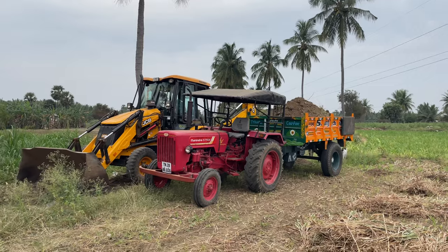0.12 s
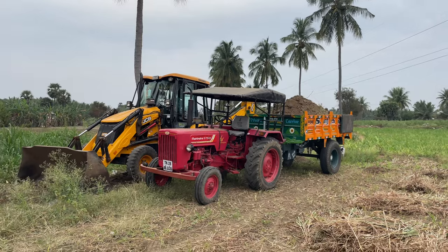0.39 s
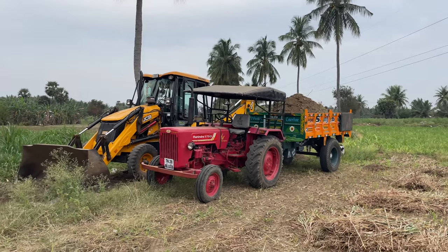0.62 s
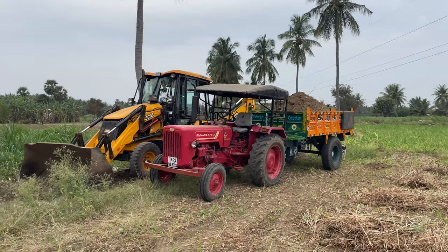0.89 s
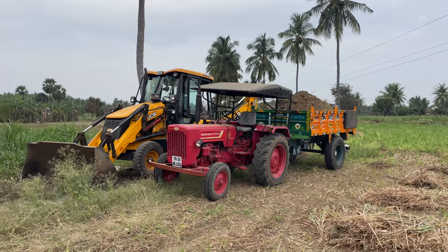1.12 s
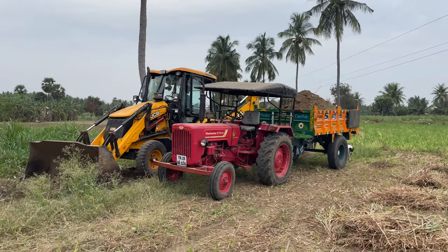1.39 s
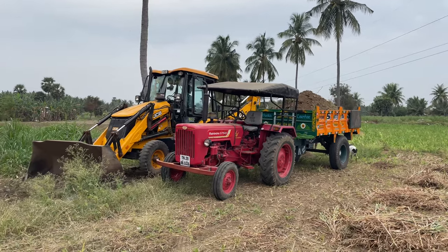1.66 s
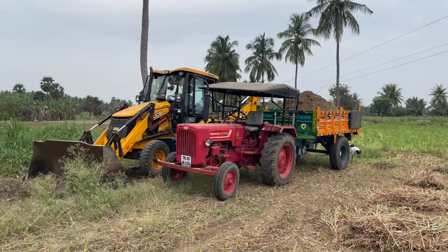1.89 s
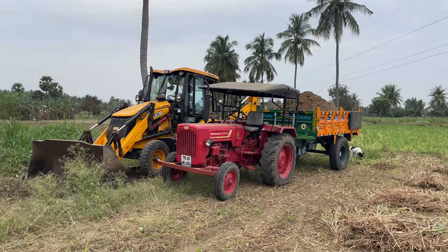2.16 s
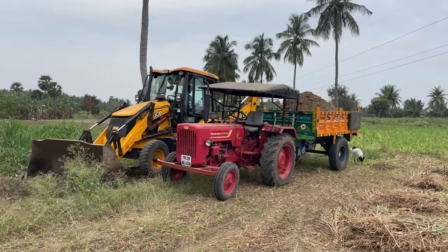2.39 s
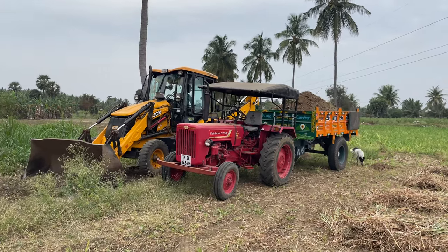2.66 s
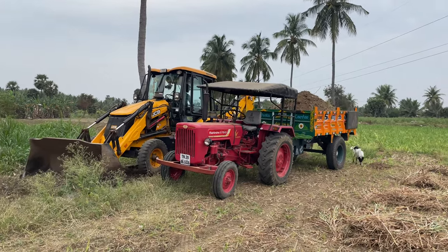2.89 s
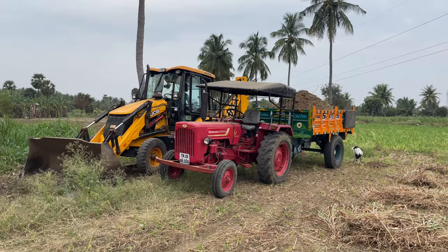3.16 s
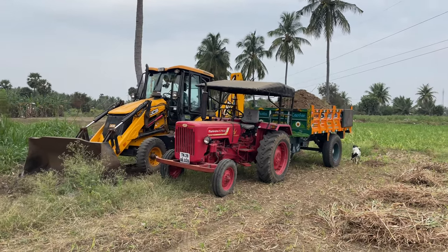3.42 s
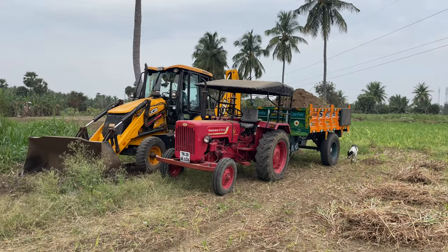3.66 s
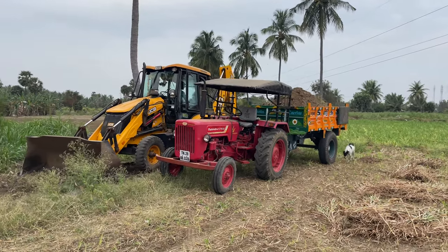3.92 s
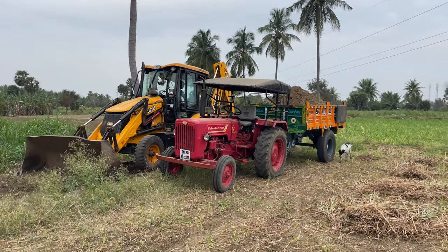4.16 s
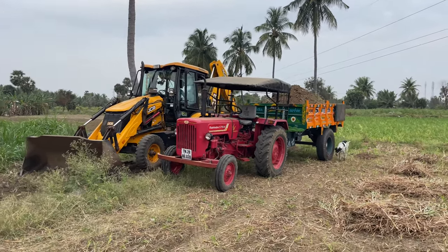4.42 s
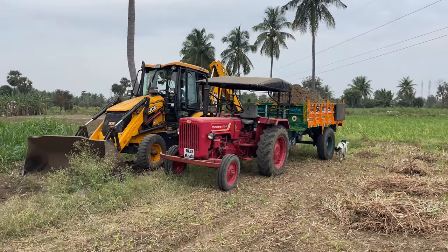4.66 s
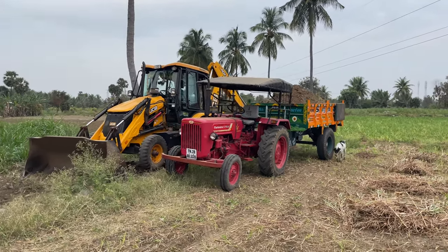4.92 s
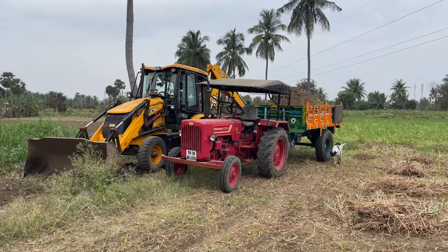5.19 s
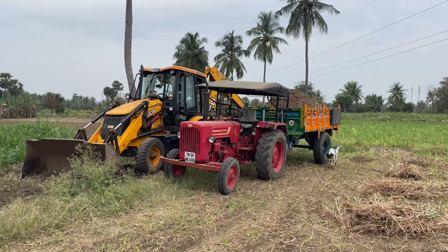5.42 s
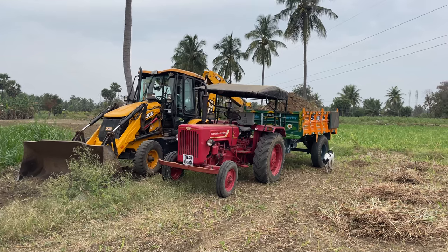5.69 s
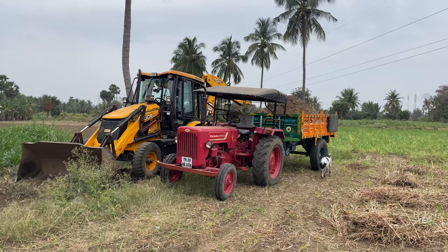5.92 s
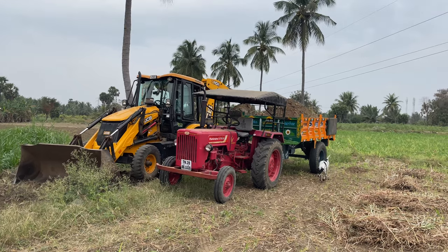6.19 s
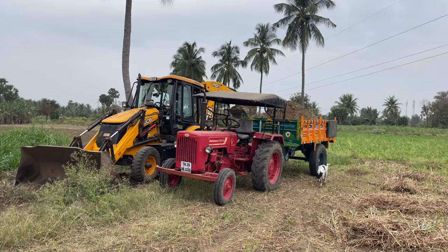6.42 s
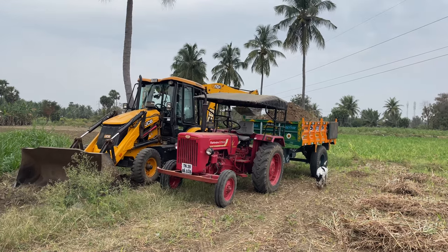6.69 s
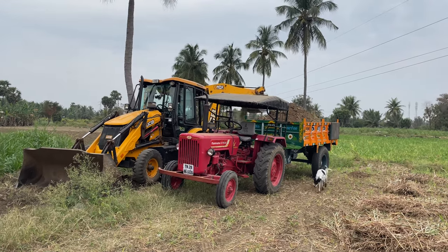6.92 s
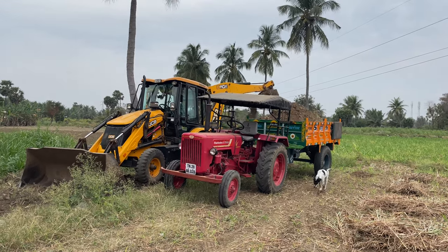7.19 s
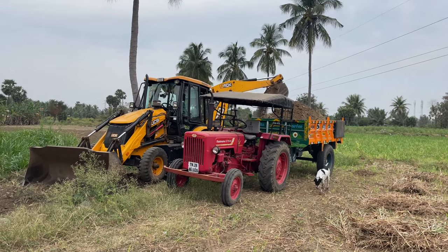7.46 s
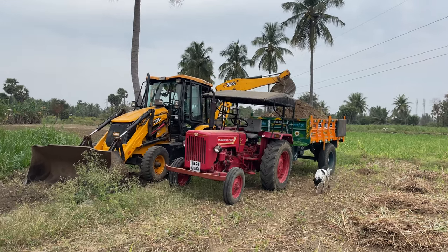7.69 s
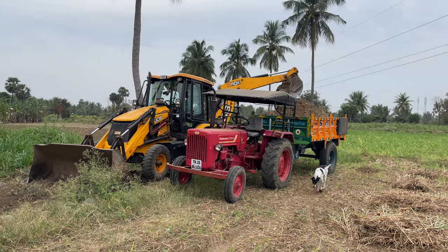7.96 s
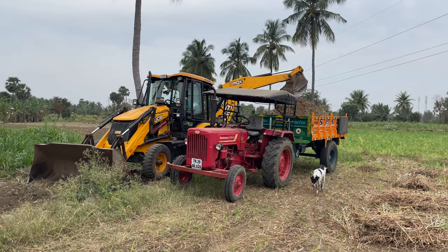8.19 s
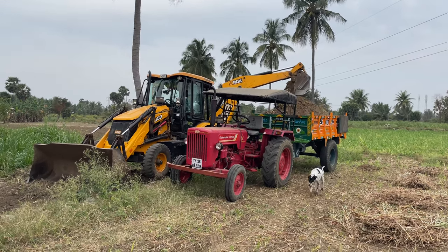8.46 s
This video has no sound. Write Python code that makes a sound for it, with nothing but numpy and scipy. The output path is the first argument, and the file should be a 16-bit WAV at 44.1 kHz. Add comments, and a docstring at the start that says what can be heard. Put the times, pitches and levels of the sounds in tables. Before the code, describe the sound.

Steady low diesel drone with fan roar and wavering hydraulic whine outdoors, soft soil hisses, then one hard rattling metal bucket knock.

```python
"""In an open field a four-cylinder diesel works at a nearly steady speed, with fans and intakes roaring.
Crank-locked tones make the exhaust hum and gear whir; shaken resonances make the combustion clatter.
Shaped noise makes roar, valve hiss and dry soil; tones and narrow noise make hydraulic song and block ringing.
Lever moves make the speed shift and hunt, a far bird chirps, and near the end the bucket knocks.
A two-port microphone hears it all."""
import sys
import numpy as np
from scipy import signal
from scipy.fft import rfft, irfft
from scipy.io import wavfile
from scipy.ndimage import uniform_filter1d

SR = 44100
rng = np.random.default_rng(int(sys.argv[2]) if len(sys.argv) > 2 else 0)


def unload_wav(signal):
    """Save mono or channel-first audio to the path in sys.argv[1] as 16-bit WAV at rate SR, clipped to [-1, 1]."""
    wavfile.write(
        sys.argv[1],
        SR,
        np.round(np.clip(np.atleast_2d(signal).T, -1, 1) * 32767).astype(np.int16),
    )


def boost_factor(decibels):
    """Convert a level in decibels to a linear amplitude factor."""
    exponent = np.asarray(decibels, float) / 20
    return 10 ** exponent


N = 378378  # length in samples
T = np.arange(N) / SR  # time in seconds
CRANK_STEPS = 3800  # crank angles told apart in one engine cycle


def evened(x):
    """Scales a sound to rms 1."""
    return x / np.sqrt(np.mean(x ** 2) + 1e-20)


def read(points, hz, column=1):
    """Reads a column of a frequency table on a log axis."""
    rows = np.transpose(points)
    return np.interp(np.log(hz + 1), np.log(rows[0] + 1), rows[column])


def coloured(x, colour):
    """Filters a sound by a table of frequency and level, then scales it to rms 1."""
    gain = boost_factor(read(colour, np.fft.rfftfreq(N, 1 / SR)))
    return evened(irfft(rfft(x) * gain, N))


def noise(colour):
    """Noise of rms 1 with the given spectrum."""
    return coloured(rng.standard_normal(N), colour)


def smooth_noise(count, size):
    """Chance of rms 1, smoothed over a number of samples."""
    return evened(uniform_filter1d(rng.standard_normal(count), size=size))


def wander(hz):
    """Slow chance of rms 1, mostly below hz."""
    smooth = uniform_filter1d(rng.standard_normal(N), size=800)
    return evened(signal.lfilter([1], [1, -np.exp(-2 * np.pi * hz / SR)], smooth))


def resonate(x, hz, width):
    """One resonance: a wider one dies away sooner."""
    r = np.exp(-np.pi * width / SR)
    return signal.lfilter([1, 0, -1], [1, -2 * r * np.cos(2 * np.pi * hz / SR), r * r], x)


def tone(hz):
    """A sine of rms 1 that follows a changing frequency."""
    return np.sqrt(2) * np.cos(2 * np.pi * np.cumsum(hz) / SR)


def arch(s, length):
    """The samples of an event and its progress from 0 to 1."""
    span = slice(max(round(s * SR), 0), round((s + length) * SR))
    return span, np.clip((T[span] - s) / length, 0, 1)


# Chirps of a far bird. Each row: start in seconds, rms level in dB at the top of the chirp before roughening.
BIRD_CHIRPS = [(6.66, -59), (6.81, -59), (6.97, -50.5), (7.14, -61), (7.3, -59)]


def bird():
    """Whistles whose pitch and level rise and fall together, slightly rough with distance."""
    length_s, end_hz, top_hz = .1, 4900, 5065
    out = np.zeros(N)
    for s, db in BIRD_CHIRPS:
        span, part = arch(s, length_s)
        rise = abs(np.sin(np.pi * part))
        out[span] += boost_factor(db) * rise ** 0.26 * tone(end_hz + (top_hz - end_hz) * rise)
    return out * (1 + 0.41 * smooth_noise(N, 150))


# Slides of dry soil. Each row: loudest moment in seconds, width (one sigma) in seconds,
# rms level in dB at the loudest.
SOIL_SLIDES = [(.28, 0.088, -42), (.84, 0.062, -36), (2.6, 0.12, -48), (2.89, 0.054, -52),
               (3.13, 0.067, -44), (3.76, 0.11, -44), (4.59, 0.039, -50), (5.24, 0.089, -44),
               (7.45, .05, -51)]
# Colour of the soil hiss. Each row: frequency in Hz, relative level in dB per Hz.
SOIL_SPECTRUM = [(1500, -14), (3500, 3), (6500, 6), (11000, 0.5), (16000, 3.5)]


def soil():
    """Sliding grains make a bright, uneven hiss that swells and fades."""
    swell = np.zeros(N)
    for s, width, db in SOIL_SLIDES:
        swell += boost_factor(db) * np.exp(-.5 * ((T - s) / width) ** 2)
    grains = boost_factor(0.81 * smooth_noise(N, 90))
    return swell * evened(noise(SOIL_SPECTRUM) * grains)


# The operator's levers load or free the pump. Each row: time in seconds, change of the settled
# crank speed in rpm.
LEVER_MOVES = [(-0.003, -45.3), (0.556, 25.2), (0.72, 11.9), (1.236, 16.9), (1.645, -10.3), (2.107, 11.1),
               (2.399, -12.3), (2.612, -44.7), (2.765, 39.9), (2.93, -4.0), (3.551, -6.8), (4.033, 12.3),
               (4.283, -24.2), (4.449, 24.5), (4.845, -7.7), (5.281, -6.5), (6.02, 1.4), (6.777, -4.3),
               (7.838, -5.7), (8.047, -38.0), (8.185, 22.0)]


def crank_speed():
    """Each lever move shifts the speed; the governor swings past the new value and settles."""
    start_rpm, hunt_hz, decay_s = 1407.6, 2.403, .45
    times, swing = T[::100], 2 * np.pi * hunt_hz
    rpm = np.full(len(times), start_rpm)
    for s, change in LEVER_MOVES:
        t = np.maximum(times - s, 0)
        hunting = np.cos(swing * t) + np.sin(swing * t) / swing / decay_s
        rpm += change * (1 - np.exp(-t / decay_s) * hunting)
    return np.interp(T, times, rpm)


def fuelling(rpm):
    """Load in dB: the governor answers a drop in speed a little late, and partly remembers it."""
    usual_rpm, lag_s, memory_s = 1389, 0.11, 1
    quick_db_per_rpm, slow_db_per_rpm = 0.09, 0.0555
    drop = np.interp(T - lag_s, T, usual_rpm - rpm)
    keep = np.exp(-1 / (memory_s * SR))
    remembered = signal.lfilter([1 - keep], [1, -keep], drop)
    return quick_db_per_rpm * drop + slow_db_per_rpm * remembered


def crank_pattern(turns):
    """One random value for each crank angle, repeated in every cycle."""
    return rng.standard_normal(CRANK_STEPS)[(turns % 1 * CRANK_STEPS).astype(int)]


# How hard each cylinder knocks. Each entry: relative level in dB, scaled where it is used.
CYLINDER_LEVELS = [0, 2, .5, -2]


def bursts(turns, lag, length, between, cylinders, uneven_db):
    """An envelope that rises at each firing and dies away; lag and length count in firings."""
    firings = 4 * turns - lag + 4  # the added 4 keeps the count positive
    count = firings.astype(int)
    size_db = cylinders * np.take(CYLINDER_LEVELS, count % 4) + uneven_db * rng.standard_normal(1000)[count]
    return uniform_filter1d(between + boost_factor(size_db) * np.exp(-(firings % 1) / length), size=60)


def ticks(turns, lag):
    """One sharp click at each ignition, unequal by cylinder and by chance."""
    count = (4 * turns - lag + 4).astype(int)
    size_db = 1.2 * np.take(CYLINDER_LEVELS, count % 4) + 1.5 * rng.standard_normal(1000)[count]
    return boost_factor(size_db) * (np.diff(count, prepend=count[0]) > 0)


# Colour of the fan and intake roar. Each row: frequency in Hz, relative level in dB per Hz.
ROAR_SPECTRUM = [(25, -21), (45, 1.5), (98, 6.5), (128, 13), (200, 3), (300, 3), (470, -13), (600, -4.5),
                 (1150, -8), (2000, -7.5), (3000, -7), (4600, -13), (5200, -68), (9000, -29), (15500, -33)]


def roar(turns, load_db):
    """Broad noise of fans and intakes, pulsing a little with the firings."""
    pulsing = bursts(turns, 0.62, 0.86, between=6.3, cylinders=.3, uneven_db=1.5)
    level_db = -32.5 + 0.083 * load_db + .5 * wander(21.0)
    return boost_factor(level_db) * evened(noise(ROAR_SPECTRUM) * pulsing)


# Colour of the noise from gears and belts. Each row: frequency in Hz, relative level in dB per Hz.
GEAR_SPECTRUM = [(250, -42), (380, 6), (560, -7.5), (720, -37), (1000, -6), (1600, -2), (2200, -38),
                 (3500, -24)]
# Tones of the timing gears and belts. Each row: multiple of the cycle rate,
# rms level in dB before wander and load.
GEAR_WHIR = [(34, -55), (45, -52), (47, -52), (48, -51), (49, -51), (51, -50), (52, -52), (53, -52),
             (55, -54), (57, -54), (59, -50), (61, -50), (62, -49), (63, -50), (87, -56), (89, -54),
             (90, -57), (101, -60), (112, -57), (113, -57)]


def gears(turns, load_db):
    """Gears and belts turn with the crank: noise that repeats every cycle, and a few clear tones."""
    repeating = boost_factor(-45) * coloured(crank_pattern(turns), GEAR_SPECTRUM)
    tones = np.zeros(N)
    for order, db in GEAR_WHIR:
        tones += boost_factor(db + wander(1.5)) * np.cos(2 * np.pi * (order * turns + rng.random()))
    return boost_factor(0.15 * load_db) * (repeating + np.sqrt(2) * tones)


# Tones of the hydraulic pump. Each row: multiple of the cycle rate, rms level in dB before wander and swell.
PUMP_TONES = [(60, -47), (66, -39), (72, -45), (80, -49), (186, -60)]
# Rise and fall of all the pump tones. Each row: time in seconds, gain in dB.
PUMP_GAIN = [(0, -6), (3.2, -1.5), (3.8, -3), (8, 0), (8.58, 0.5)]


def pump(turns):
    """Wavering tones whose pitch is tied to the crank that drives the pump."""
    tones = np.zeros(N)
    for order, db in PUMP_TONES:
        tones += boost_factor(db + 1.2 * wander(1.2)) * np.cos(2 * np.pi * (order * turns + rng.random()))
    times, gain_db = np.transpose(PUMP_GAIN)
    return np.sqrt(2) * boost_factor(np.interp(T, times, gain_db)) * tones


# Pump pressure building until the valve lets go. Each row: start in seconds, length in seconds,
# rms level in dB at the loudest.
PRESSURE_MOANS = [(-.05, 0.44, -34), (0.37, 0.36, -36.5), (2.2, 0.36, -45.5), (2.967, 0.4, -42),
                  (4.098, 0.57, -31.5), (4.373, 0.23, -31.5), (4.617, 0.43, -30.5), (5.1, 0.486, -36.5),
                  (5.354, 0.91, -40.5), (8.02, 0.24, -39.5), (8.234, 0.22, -36)]


def moans(turns):
    """A pressure tone at 24 times the cycle rate, swelling and fading with a late top."""
    out = np.zeros(N)
    for s, length, db in PRESSURE_MOANS:
        span, part = arch(s, length)
        pressure = abs(np.sin(np.pi * part ** 1.4)) ** 0.91  # a power over 1 puts the top late
        out[span] += boost_factor(db) * np.sqrt(2) * pressure * np.cos(2 * np.pi * 24 * turns[span])
    return out


# Passing gliding tones: first a swell of the pump's tone near 695 Hz, then valve whistles near 2.4 kHz.
# Each row: start in seconds, length in seconds, start pitch in Hz, end pitch in Hz,
# rms level in dB at the loudest.
GLIDING_TONES = [(3.3, 1.5, 692, 699, -42), (.7, .4, 2415, 2410, -49), (1.78, .15, 2415, 2430, -46),
                 (2.1, .45, 2415, 2410, -49), (2.75, .3, 2400, 2480, -45), (3.25, .25, 2410, 2460, -47),
                 (3.75, .63, 2405, 2435, -43.5), (4.5, .25, 2430, 2490, -41), (4.8, .3, 2430, 2440, -47),
                 (5.33, .2, 2500, 2420, -44), (5.6, .4, 2420, 2410, -45), (6.25, .65, 2410, 2425, -45),
                 (7.35, .6, 2430, 2440, -51)]


def passing_tones():
    """A pump swell and valve whistles: gliding tones with a slightly unsteady pitch."""
    out = np.zeros(N)
    for s, length, start_hz, end_hz, db in GLIDING_TONES:
        span, part = arch(s, length)
        glide = start_hz + (end_hz - start_hz) * part
        unsteady = 1 + .003 * smooth_noise(len(part), 2000)
        out[span] += boost_factor(db) * abs(np.sin(np.pi * part)) ** .3 * tone(glide * unsteady)
    return out


# Fuzzy whines pulsing with the firings: oil flow, and block ringing near 2.56 kHz. Each row: start in
# seconds, length in seconds, pitch in Hz, width in Hz, rms level in dB before the rise and fall.
FUZZY_WHINES = [(-.3, 1.3, 335, 40, -39), (.1, .75, 940, 90, -35), (.1, 1.0, 750, 50, -34),
                (5.6, .9, 335, 35, -41), (7.8, 1.3, 925, 40, -37), (1.0, 2.7, 1655, 40, -42),
                (4.5, 4.8, 2570, 60, -48), (-.1, 1.0, 2480, 160, -45), (2.55, .7, 2520, 140, -45),
                (8.1, .7, 2550, 90, -42)]


def whines(turns):
    """Noise pulsing with the firings, made into a fuzzy whine by a narrow resonance."""
    pulsing = bursts(turns, 0.374, 0.33, between=1.0, cylinders=1.01, uneven_db=-1.5)
    out = np.zeros(N)
    for s, length, hz, width, db in FUZZY_WHINES:
        span, part = arch(s, length)
        drive = pulsing[span] * rng.standard_normal(len(part))
        out[span] += boost_factor(db) * abs(np.sin(np.pi * part)) ** 0.74 * evened(resonate(drive, hz, width))
    return out


# Short groans as the arm moves. Each row: start in seconds, length in seconds, start pitch in Hz,
# end pitch in Hz, rms level in dB at the loudest before roughening.
ARM_GROANS = [(0.2, 0.16, 915, 955, -38), (0.275, 0.12, 742, 743, -35), (0.454, 0.12, 755, 745, -31.5),
              (0.64, .1, 960, 925, -34), (1.19, 0.052, 348, 357, -34), (1.463, 0.11, 955, 874, -34),
              (1.779, 0.136, 616, 500, -39.5), (2.03, 0.085, 630, 550, -40), (2.369, 0.093, 890, 905, -35),
              (2.57, .09, 270, 255, -35), (2.57, .1, 190, 160, -33), (2.68, .06, 230, 150, -31),
              (2.893, 0.05, 923, 936, -40)]


def groans():
    """The hydraulics groan: short gliding tones with a rough level."""
    out = np.zeros(N)
    for s, length, start_hz, end_hz, db in ARM_GROANS:
        span, part = arch(s, length)
        glide = start_hz + (end_hz - start_hz) * part
        rough = 1 + .2 * smooth_noise(len(part), 300)
        out[span] += boost_factor(db) * rough * abs(np.sin(np.pi * part)) ** 0.3 * tone(glide)
    return out


# The blow and its rebounds. Each row: time in seconds, peak level in dB, brightness in dB per octave.
BUCKET_KNOCKS = [(8.271, -15, -12), (8.288, -24, 6), (8.291, -13.5, 3), (8.2965, -10, 0),
                 (8.304, -13.5, -1.5), (8.312, -15, -4), (8.328, -17, -3), (8.341, -18.5, -5.5),
                 (8.36, -18, -11), (8.379, -22, -6), (8.400, -23, -6), (8.412, -20, -12),
                 (8.448, -16.5, -12.5), (8.488, -24, -2)]
# Ringing of the bucket steel. Each row: frequency in Hz, level in dB before the brightness tilt,
# time to fall by 60 dB in seconds.
BUCKET_STEEL = [(550, -4, .08), (830, -3, .06), (1150, -2, .03), (1500, 2, .04), (1900, -3, .02),
                (2570, 3, .045), (3150, 1, .025), (4040, -4, .015), (5200, -13, .012), (6200, -14, .01)]


def bucket():
    """A blow and its rebounds: sharp cracks with a short rattle shake the damped steel."""
    t, out = np.arange(SR // 4) / SR, np.zeros(N)
    for s, db, tilt_db in BUCKET_KNOCKS:
        crack = rng.standard_normal(len(t)) * (np.exp(-t / .002) + .3 * np.exp(-t / .028))
        ring = np.zeros(len(t))
        for hz, mode_db, t60 in BUCKET_STEEL:
            mode_gain = boost_factor(mode_db + tilt_db * np.log2(hz / 2000))
            ring += mode_gain * evened(resonate(crack, hz, 2.2 / t60))
        crash = evened(resonate(resonate(crack, 2200, 3000), 2200, 3000))  # broad, without a clear pitch
        hit = evened(ring) + .7 * boost_factor(tilt_db) * crash
        hit = signal.lfilter(*signal.butter(2, 4200, fs=SR), hit)  # the trailer screens the treble
        part = out[round(s * SR):][:len(t)]
        part += boost_factor(db) * hit[:len(part)] / abs(hit).max()
    return out


# Colour of the exhaust valve hiss. Each row: frequency in Hz, relative level in dB per Hz.
VALVE_SPECTRUM = [(4000, 5), (5500, -7), (8000, -19), (11000, 1.5), (16000, -7)]


def valves(turns):
    """A puff of hiss as each exhaust valve opens."""
    puffs = bursts(turns, 0.17, 0.2, between=0.07, cylinders=.2, uneven_db=4.0)
    return boost_factor(-52.0) * evened(noise(VALVE_SPECTRUM) * puffs)


# Engine block and panels rung by combustion. Each row: frequency in Hz, width in Hz, rms level in dB
# before wander and load, crank lag in firings, relative size of the ignition tick.
BLOCK_MODES = [(330.3, 68, -41, 0.569, 4.2), (719, 92, -36, 0.54, 14.6), (878, 160, -39.5, 0.45, 1.1),
               (1320, 54, -47.5, 0.4, 8.4), (1462, 69, -44.5, 0.38, 14.6), (1668, 92, -46.5, 0.45, 8.1),
               (2466, 90, -43.5, 0.318, 12), (2572, 79, -47, 0.5, 12), (2740, 1450, -45.5, 0.433, 2.7),
               (3420, 98, -54, 0.14, 5), (4075, 190, -49.5, 0.24, 5), (6970, 1860, -48.5, 0.089, 1.5)]


def clatter(turns, load_db):
    """Each combustion ticks and shakes the block, partly alike in every cycle; its modes ring on."""
    out = np.zeros(N)
    for hz, width, db, lag, tick in BLOCK_MODES:
        shake = .4 * crank_pattern(turns) + rng.standard_normal(N)
        combustion = bursts(turns, lag, .18, between=.36, cylinders=1.01, uneven_db=1.1)
        drive = combustion * shake + tick * ticks(turns, lag)
        ringing = evened(resonate(resonate(drive, hz, width), hz, 3 * width))
        out += boost_factor(db + 0.8 * wander(2.9)) * ringing
    return boost_factor(0.55 * load_db) * out


# Exhaust tones, every fourth multiple a firing tone. Each row: multiple of the cycle rate,
# relative level in dB before load.
EXHAUST_TONES = [(4, -5.8), (5, -38), (6, -20.5), (7, -25), (8, 0), (9, -29), (10, -17), (11, -32),
                 (12, -8.7), (13, -25), (14, -24), (16, -24.5), (17, -24), (18, -34), (19, -21.5),
                 (20, -30), (21, -22.5), (23, -30), (25, -29), (28, -32)]


def exhaust(turns, load_db):
    """Crank-locked tones; a curved phase rule moves the higher ones ahead; in-between ones are turned over."""
    tones = np.zeros(N)
    for order, db in EXHAUST_TONES:
        lead = .072 * (order ** 2 - 64) - 1.59 * (order - 8) + np.pi * (order % 4 > 0)  # in radians
        # Load lifts the higher firing tones most, the in-between tones little.
        share = .4 if order % 4 else .62 * np.clip(order / 8, 1, 2)
        tones += boost_factor(db + share * load_db) * np.cos(2 * np.pi * order * turns + lead)
    return np.sqrt(2) * boost_factor(-23) * tones


def scene():
    """The machine and its surroundings, mixed alike into two channels."""
    rpm = crank_speed()
    turns = .011 + np.cumsum(rpm) / 120 / SR  # in engine cycles; one cycle is two crank turns
    load_db = fuelling(rpm)
    surroundings = bird() + soil() + roar(turns, load_db)
    singing = pump(turns) + moans(turns) + passing_tones() + whines(turns) + groans()
    engine = gears(turns, load_db) + valves(turns) + clatter(turns, load_db) + exhaust(turns, load_db)
    return np.tile(surroundings + singing + bucket() + engine, (2, 1))


# Stereo colour of the finished sound: port differences below about 6 kHz; above, the phase between the channels
# holds near 0 or half a turn in steps. # Each row: frequency in Hz, left over right in dB, lead of the left in
# radians, likeness from 0 to 1.
STEREO_COLOUR = [(60, 0, 0, 1), (150, .1, 0, 1), (300, 1.8, -.05, .98), (430, 1.1, -.2, .93),
                 (520, -4, .5, .8), (610, 2.3, 1.1, .91), (670, 9.5, .9, .87), (740, 9.5, .6, .83),
                 (860, 13.7, -.2, .67), (1000, 8.9, -1.5, .76), (1160, -2.5, .4, .41),
                 (1290, 8.1, 1.05, .67), (1420, 14.2, -.85, .65), (1600, 6.2, -1.2, .88),
                 (1900, .7, -.5, .76), (2200, 10, .26, .35), (2400, -.5, -1.8, .95), (3200, -.3, -1.9, .86),
                 (3450, 5.3, -2.8, .66), (3700, 1.3, -2.8, .4), (4000, 10.6, -4.1, .5),
                 (4450, 1.9, -3.4, .6), (4950, -3.5, -5.8, .52), (5600, .1, -6.25, .8),
                 (6300, -4, -4.7, .65), (6950, 0, -3.17, .99), (8250, 0, -3.11, .99), (9000, 0, -1.2, .7),
                 (11000, 0, 0, .9), (12600, 0, 1.4, .7), (13300, 0, 3, .97), (14900, 0, 3.3, .97),
                 (15600, 0, 4.4, .6)]


def right_channel(sound):
    """Level and phase of the right channel are set by frequency, and part of it is scattered sound."""
    hz = np.fft.rfftfreq(N, 1 / SR)
    frames = signal.stft(sound, nperseg=1024, noverlap=512)[2]
    frames *= np.exp(2j * np.pi * rng.random(frames.shape))  # random phases scatter the sound
    scattered = 1.25 * signal.istft(frames, nperseg=1024, noverlap=512)[1][:N]  # makes up the lost level
    alike = np.clip(read(STEREO_COLOUR, hz, column=3), 0, 1)
    level_and_phase = np.exp(-1j * read(STEREO_COLOUR, hz, column=2)) / boost_factor(read(STEREO_COLOUR, hz))
    mixed = alike * rfft(sound) + np.sqrt(1 - alike ** 2) * rfft(scattered)
    return irfft(level_and_phase * mixed, N)


def low_pass(x):
    """Removes everything above the highest recorded frequency."""
    return signal.sosfilt(signal.butter(12, 15970, fs=SR, output="sos"), x)


def record(dry):
    """The left channel keeps the sound as it is; the right one takes the stereo colour."""
    return low_pass(np.array([dry[0], right_channel(dry[1])]))


dry = scene()
out = record(dry)
unload_wav(out)
```